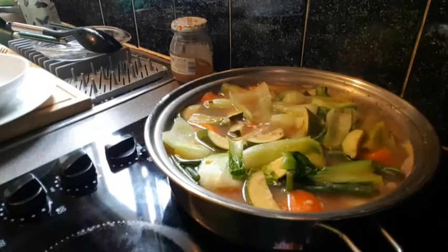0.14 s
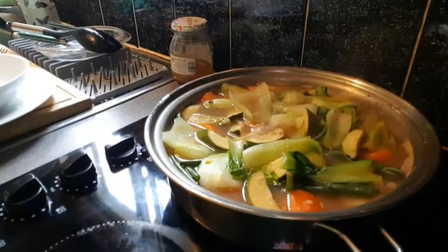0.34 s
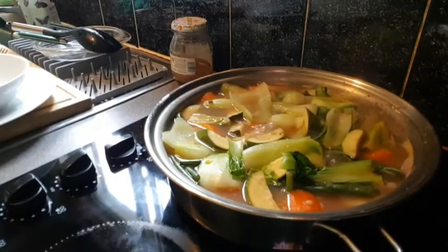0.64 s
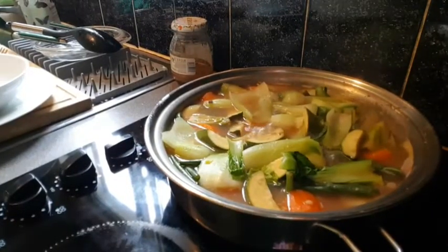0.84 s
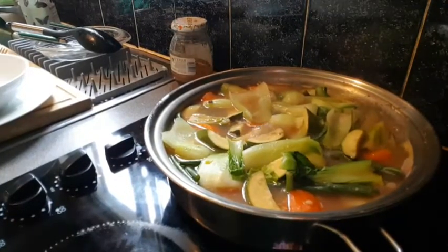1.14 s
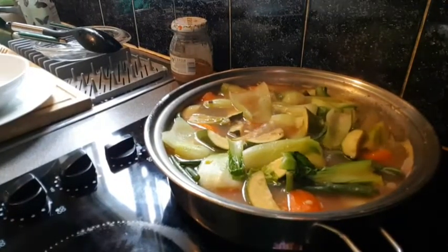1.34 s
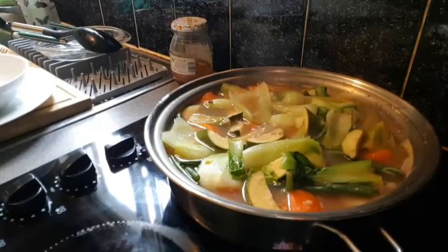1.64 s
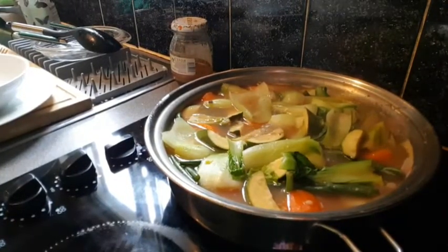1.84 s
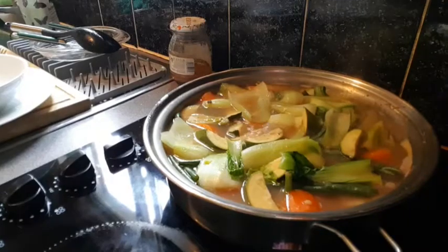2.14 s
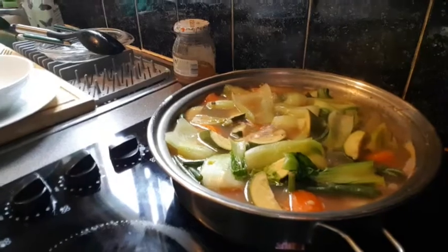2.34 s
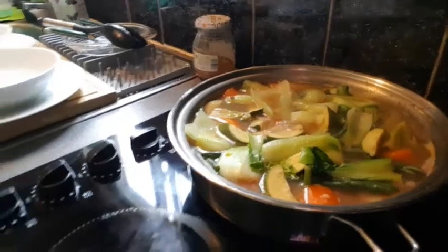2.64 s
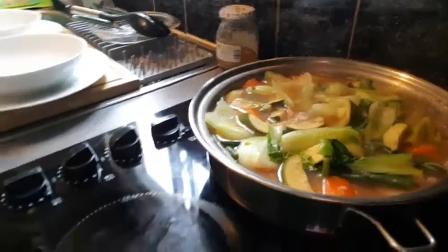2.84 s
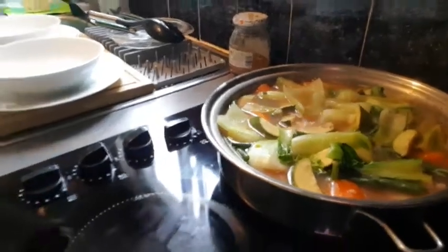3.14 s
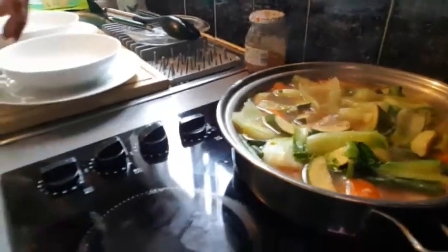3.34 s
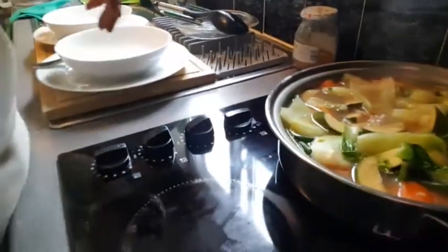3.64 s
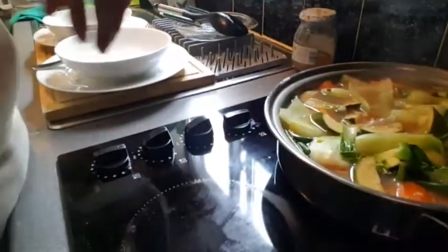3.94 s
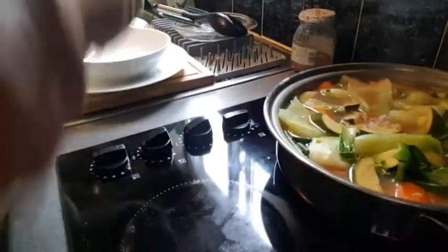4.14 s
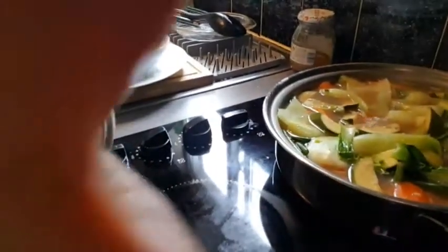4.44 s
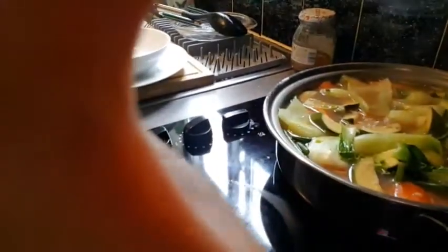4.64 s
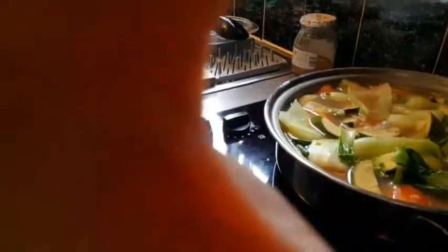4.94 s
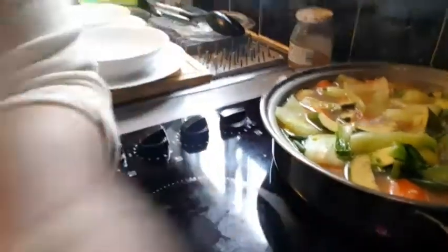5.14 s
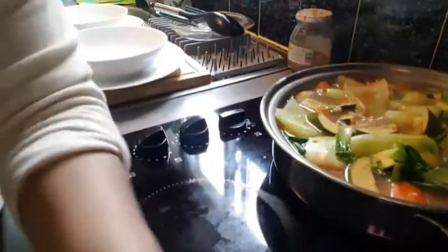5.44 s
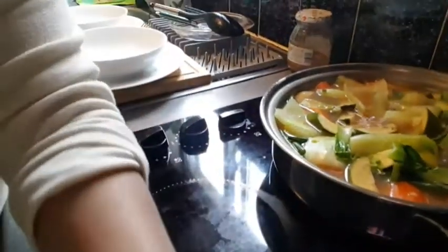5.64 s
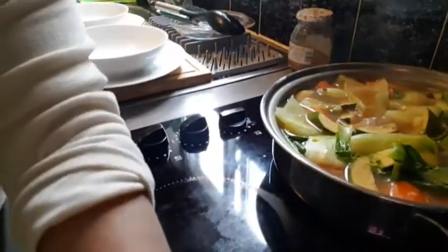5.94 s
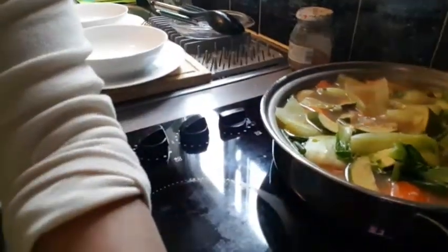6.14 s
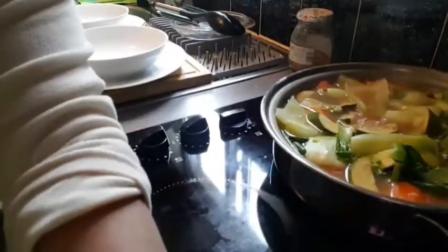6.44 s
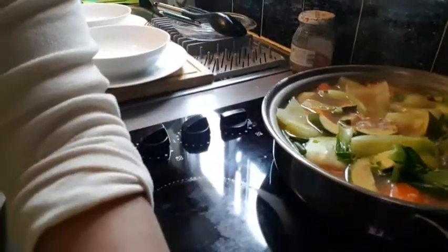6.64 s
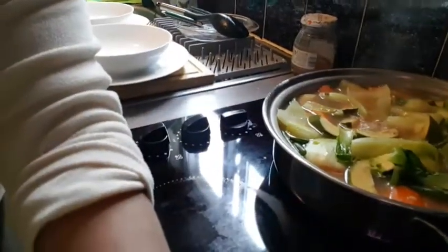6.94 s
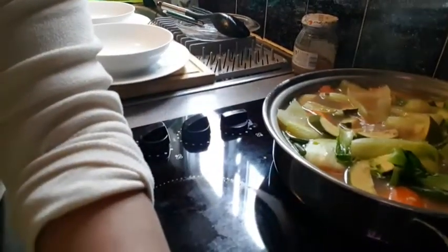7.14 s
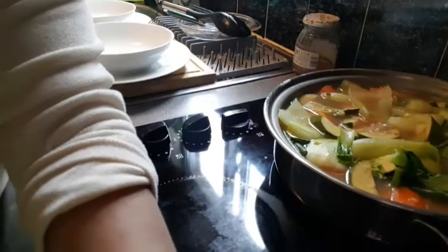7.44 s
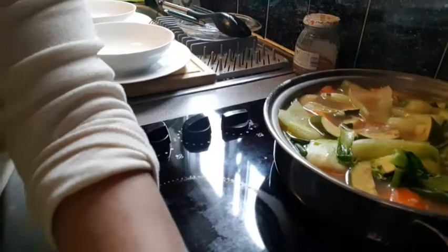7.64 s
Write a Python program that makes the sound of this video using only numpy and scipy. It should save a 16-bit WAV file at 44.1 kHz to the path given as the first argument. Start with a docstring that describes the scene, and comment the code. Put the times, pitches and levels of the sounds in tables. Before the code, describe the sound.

A wide pot of vegetable soup bubbles and glugs in a home kitchen, with dull knocks, a brief squeak and a hollow clunk before the boil eases.

```python
"""In a kitchen, vegetable soup simmers in a wide steel pot, a little to the right of the stereo microphone.
Steam glugs up as low, gliding rings; surface bubbles pop as short rings with snaps of noise; droplets tick.
Beside the stove, shaped noise rustles, furniture modes ring in two dull knocks, a stick-slip contact squeaks
and something hollow clunks down. Later the boil eases. Thin sizzle, room air and hum lie behind."""
import sys
import numpy as np
from scipy import signal
from scipy.fft import rfft, irfft
from scipy.io import wavfile
from scipy.ndimage import uniform_filter1d

SR = 44100
rng = np.random.default_rng(int(sys.argv[2]) if len(sys.argv) > 2 else 0)


def int16_out(signal):
    """Quantize to a 16-bit WAV file."""
    q = np.round(np.clip(np.atleast_2d(signal).T, -1, 1) * 32767)
    wavfile.write(sys.argv[1], SR, q.astype(np.int16))


N = 343980
TIME = np.arange(N) / SR
EDGE_HZ = 15900  # top of the recorder's band

# strength of the boil, which holds, eases and partly recovers: time_s, level_db
BOIL_CURVE = [(0, 0.5), (1.1, 3), (1.85, 1.5), (2.45, 0.5), (2.7, 1.5), (3.5, 0.5), (4.4, -1), (5.95, 0.5),
              (6.35, -1.5), (6.75, -18.5), (7.2, -20.5), (7.8, -11)]
# liveliness of the bubbling at the surface: time_s, level_db
FROTH_CURVE = [(0, 4), (.7, 1), (1.0, 1), (1.5, 0), (2.05, -0.5), (2.6, 1.5), (3.35, 2), (3.65, -2.5),
               (3.95, 1.5), (4.3, -0.5), (5.3, 1), (6.3, -3.5), (6.65, 1.5), (6.9, -6), (7.2, -6),
               (7.55, -4), (7.8, -0.5)]
# likeness of the two channels in diffuse sound: frequency_hz, likeness (0-1)
CHANNEL_LIKENESS = [(30, 1), (250, 0.87), (600, 0), (1500, 0), (5000, 0.02), (15000, 0)]


def pops(glide=0.048, glide_per_octave=0.24, echo_db=-4, snap_db=-14.0, puff_db=-16, puff_hz=820,
         after_db=-12, after_s=0.0083, after_ratio=1.227, count=2):
    """A film snaps, its cavity rings (small ones chirp up, large ones sag), steam puffs, neighbours follow."""
    # the largest bubbles bursting: start_s, level_db, pitch_hz, film_db (snap, before snap_db)
    large_pops = [(0.024, -33, 1800, -70), (0.1353, -37, 1950, -55), (0.178, -34, 1730, -55),
                  (0.2411, -38.5, 2120, -68), (0.2483, -35, 2120, -71), (0.3038, -39, 2020, -79),
                  (0.3195, -47, 2180, -76), (0.467, -40, 2220, -54), (0.474, -30.5, 1630, -55),
                  (0.5147, -38, 2720, -57), (0.5249, -29, 1760, -62), (0.6082, -33.5, 1530, -76),
                  (0.634, -35.5, 1430, -61), (0.6483, -29.5, 2010, -48.5), (0.718, -36, 1860, -76),
                  (0.7398, -41, 2200, -71), (0.785, -41, 1110, -82), (0.8253, -40, 1380, -66),
                  (0.8364, -33.5, 2300, -73), (0.946, -42, 2720, -50.5), (1.0583, -41, 1430, -58),
                  (1.1905, -36, 1590, -58), (1.2063, -34, 2150, -54), (1.2221, -39, 2150, -56),
                  (1.3146, -56, 1900, -69), (1.3216, -38.5, 1450, -55), (1.3545, -39, 900, -77),
                  (1.367, -29, 1340, -49), (1.4254, -40.5, 1660, -63), (1.4438, -37.5, 1620, -53.5),
                  (1.4588, -33, 1530, -55), (1.4992, -44.5, 2920, -78), (1.5376, -42, 2000, -60),
                  (1.5468, -30, 1740, -62), (1.5802, -39, 2230, -51), (1.607, -40, 1890, -68),
                  (1.6904, -28.5, 1650, -79), (1.6943, -30, 1860, -71), (1.756, -41, 1670, -59),
                  (1.772, -44, 3030, -73), (1.9157, -33, 1260, -58), (1.966, -40, 2130, -77),
                  (2.0255, -49, 3100, -61), (2.123, -38.5, 1680, -80), (2.1631, -42, 1710, -63),
                  (2.198, -40, 1800, -75), (2.2574, -36, 2800, -67), (2.418, -33.5, 2200, -81),
                  (2.4517, -44, 2140, -78), (2.555, -36, 1220, -74), (2.6207, -36.5, 1880, -64),
                  (2.722, -34, 1190, -61), (2.815, -61, 2500, -48), (2.8657, -38, 2550, -80),
                  (2.9, -32, 1320, -86), (2.9635, -34.5, 2400, -58), (3.011, -36.5, 1410, -81),
                  (3.043, -44, 1870, -67), (3.2516, -42.5, 1930, -56.5), (3.2658, -35, 1250, -76),
                  (3.3324, -32, 1690, -74), (3.3824, -33.5, 1950, -52), (3.404, -29.5, 1580, -55),
                  (3.5262, -39, 1840, -68), (3.5479, -41, 1600, -64), (3.9026, -35, 1450, -57),
                  (3.9256, -38, 2120, -54), (3.9362, -35, 1660, -66), (3.9558, -44, 1980, -70),
                  (4.0453, -34.5, 1710, -79), (4.1043, -32.5, 1620, -65), (4.163, -49, 2740, -52),
                  (4.3797, -44, 1910, -62), (4.4255, -33, 2520, -58), (4.4874, -59, 3150, -50.5),
                  (4.5447, -38.5, 3040, -59), (4.576, -48, 1710, -77), (4.6364, -36, 1200, -52.5),
                  (4.7024, -42, 3750, -52), (4.8565, -43.5, 3600, -63), (4.8776, -34.5, 1820, -51),
                  (4.917, -40.5, 1670, -71), (4.9287, -43, 2930, -57), (5.0025, -37, 1520, -58.5),
                  (5.1267, -30.5, 1500, -77), (5.1815, -35.5, 1500, -77), (5.1946, -38, 2680, -54),
                  (5.2424, -33, 1490, -79), (5.2782, -34, 1620, -71), (5.3577, -39, 1470, -57),
                  (5.4027, -38, 2100, -56), (5.4328, -42.5, 1020, -78), (5.453, -34.5, 1880, -70),
                  (5.5706, -37.5, 2250, -57), (5.58, -40.5, 2060, -51.5), (5.657, -35, 1680, -53.5),
                  (5.755, -27.5, 1720, -66), (5.7687, -46, 2040, -51), (5.7914, -35, 2290, -48),
                  (5.816, -33, 1930, -53), (5.8393, -42, 1570, -75), (5.8692, -39, 1750, -55),
                  (5.9, -38, 1840, -82), (5.9445, -37.5, 1480, -80), (5.9876, -48, 2450, -51.5),
                  (6.0082, -28.5, 1380, -78), (6.0185, -36, 1400, -78), (6.0298, -44, 1320, -71),
                  (6.1312, -32, 1330, -76), (6.172, -34.5, 1700, -69), (6.1845, -39, 3560, -50),
                  (6.2439, -29.5, 1550, -63), (6.2792, -39, 1880, -71), (6.3047, -36, 1620, -50.5),
                  (6.3282, -47, 3200, -57), (6.3518, -40.5, 1780, -68), (6.3778, -33.5, 1810, -45),
                  (6.4255, -34.5, 2760, -51), (6.4818, -49, 2100, -54), (6.5225, -30.5, 1650, -48),
                  (6.5404, -34, 1600, -62), (6.5756, -44, 1990, -73), (6.598, -40.5, 2450, -57),
                  (6.6827, -40, 1140, -75), (6.713, -37, 2000, -63), (6.82, -49, 1740, -75),
                  (6.851, -49, 2900, -65), (7.0008, -42.5, 2050, -85), (7.0601, -48, 1810, -67),
                  (7.0827, -46, 2250, -63.5), (7.0996, -46.5, 1900, -72), (7.1848, -50, 1800, -84),
                  (7.2744, -44, 1490, -59), (7.2876, -42, 1600, -60), (7.3224, -50, 2570, -55),
                  (7.3469, -41, 1180, -73), (7.497, -45, 1890, -77), (7.5092, -40, 1610, -68),
                  (7.5253, -48, 2240, -55), (7.6324, -39, 1210, -73), (7.673, -43, 1960, -56),
                  (7.6852, -51, 2180, -70), (7.7839, -31, 1630, -57)]
    typical_hz, typical_cycles = 1820, 1.15
    ring_power = 2.4  # power of pitch by which smaller bubbles ring for more cycles
    fewest_cycles, most_cycles = 1.05, 3.0
    lead_s = .0015  # from the snap to the ring
    out = np.zeros((2, N))
    for s, db, hz, film_db in large_pops + small_pops():
        burst = np.zeros(SR // 25)
        film = snap(low_hz=2000, high_hz=4200, decay_s=.0012)
        cycles = np.clip(typical_cycles * (hz / typical_hz) ** ring_power, fewest_cycles, most_cycles)
        bend = np.clip(glide + glide_per_octave * np.log2(hz / typical_hz), -.4, .25)
        cavity = bubble(hz, cycles, rise=.9, glide=bend)
        steam_hz = min(puff_hz, hz) * rng.uniform(0.57, 1.54)
        puff = bubble(steam_hz, cycles=0.92, rise=1.0, glide=0)
        add(burst, 0, gain_of(film_db + snap_db) * film)
        add(burst, lead_s, gain_of(db) * cavity)
        add(burst, lead_s, gain_of(db + puff_db) * puff)
        for k in range(count):
            neighbour_hz = min(hz, typical_hz) * after_ratio * rng.uniform(.7, 1.4)
            neighbour = bubble(neighbour_hz, cycles=1.3, rise=.9, glide=bend)
            wait_s = after_s * (k + 0.302 + rng.random())
            add(burst, lead_s + wait_s, gain_of(db + after_db) * neighbour / (k + 1))
        heard = bounced(burst, rng.uniform(.0001, .00028), echo_db, spread_s=.0033)
        add(out, s - lead_s, panned(heard, 4.7 + rng.standard_normal()))
    return out


def small_pops(top_db=-43, range_db=13, pitch_hz=2050, octaves=0.37, film_db=-62, film_range_db=14, count=150):
    """Lesser bubbles burst at random, louder where the surface is lively; columns as for the large pops."""
    when, size, film, pitch = rng.random((4, count))
    s = (np.arange(count) + 2 * when) % count / count * N / SR
    hz = pitch_hz * 2 ** (octaves * (2 * pitch + 2 * size - 2))  # weaker bubbles tend to be higher
    lively = follow(FROTH_CURVE, s)
    return list(zip(s, top_db - range_db * size + lively, hz, film_db - film_range_db * film + lively))


def glugs(level_db=-7.0, rise=0.38, glide=0.72, slap_db=-14, slap_hz=480):
    """A big steam bubble heaves the broth, ringing low and gliding up; the broth slaps shut behind it."""
    # the largest steam bubbles: start_s, level_db (before the setting level_db), pitch_hz,
    # ring_cycles (to 1/e; bubble() rings for 0.4 at least)
    large_glugs = [(0.068, -27, 225, 1.56), (0.36, -26.5, 149, 0.67), (0.405, -32, 235, 2.1),
                   (0.4406, -36, 250, 0.69), (0.6157, -27.5, 226, 1.34), (0.818, -22, 199, 0.49),
                   (0.8514, -25.5, 280, 0.75), (1.0405, -33, 160, 0.61), (1.124, -27, 256, 1.2),
                   (1.3521, -31, 205, 0.78), (1.4549, -32, 191, 0.37), (1.542, -30, 170, 0.55),
                   (1.638, -30, 223, 0.32), (1.686, -33, 272, 1.25), (2.26, -23, 196, 1.1),
                   (2.355, -35, 145, 4.6), (2.4028, -26.5, 187, 0.74), (2.425, -37, 152, 4.6),
                   (2.447, -33, 147, 3), (2.4822, -25, 180, 0.32), (2.506, -36.5, 153, 2.7),
                   (2.8697, -28.5, 252, 0.44), (3.0033, -26, 182, 0.37), (3.204, -28, 280, 0.36),
                   (3.503, -29, 270, 0.6), (3.546, -31.5, 217, 0.75), (3.917, -28.5, 283, 0.48),
                   (4.0447, -27, 204, 0.33), (4.1419, -32, 203, 0.85), (4.2639, -34.5, 201, 1.1),
                   (4.375, -31, 336, 0.9), (4.836, -31, 180, 0.35), (5.244, -28, 198, 0.89),
                   (5.9596, -29.5, 187, 0.95), (6.1764, -31.5, 167, 1.15), (6.72, -32, 380, 0.64),
                   (6.808, -34.5, 384, 0.87), (6.888, -36, 327, 1.3), (6.949, -40, 420, 0.31),
                   (7.0487, -36.5, 312, 0.7), (7.416, -37, 382, 0.38), (7.764, -38.5, 330, 1.1)]
    out = np.zeros((2, N))
    for s, db, hz, cycles in large_glugs + small_glugs():
        heave = bounced(bubble(hz, cycles, rise, glide), .00012, echo_db=-7.5, spread_s=0.00679)
        closing = bubble(slap_hz * rng.uniform(.8, 1.25), cycles=.6, rise=.3, glide=.1)
        slap = bounced(closing, .0003, echo_db=-5, spread_s=.003)
        add(out, s, gain_of(db + level_db) * panned(heave, 3.7))
        add(out, s + .5 / hz, gain_of(db + level_db + slap_db) * panned(slap, 18.6))
    return out


def small_glugs(top_db=-33, range_db=7, pitch_hz=200, octaves=0.74, boil_share=0.59, rise_hz_per_db=6, count=40):
    """Lesser glugs come at random, weaker and higher as the boil eases; columns as for the large glugs."""
    when, size, pitch, length = rng.random((4, count))
    s = (np.arange(count) + when) / count * N / SR
    boil = follow(BOIL_CURVE, s)
    hz = (pitch_hz - rise_hz_per_db * boil) * 2 ** (octaves * (2 * pitch - 1))
    return list(zip(s, top_db - range_db * size + boil_share * boil, hz, (1 + length) / 2))


def simmer(crackle_db=-70.5, fine_db=-61.5, burble_db=-56, churn_db=-54.5, burble_share=0.31, roll_db=3.5):
    """Broth churns in surges and burbles with the boil; fine bubbling and faint crackle follow the froth."""
    # spectrum of the churning broth: frequency_hz, level_db
    churn_colour = [(15, -33), (25, -8), (32, -27), (42, 1), (60, -7.5), (90, -1.5), (125, -5.5), (160, -3),
                    (215, -3.5), (300, -7.5), (420, -17.5), (650, -29), (1200, -25), (4000, -73)]
    boil, froth = follow(BOIL_CURVE, TIME), follow(FROTH_CURVE, TIME)
    surges = roll_db * flicker(size=2600)
    churn = gain_of(churn_db + boil + surges) * noise(churn_colour)
    low_bubbles = swarm(low_hz=217.8, high_hz=656, per_s=200, spread_db=6.0, tilt_db=-6.0)
    burble = gain_of(burble_db + burble_share * boil) * low_bubbles
    small_bubbles = swarm(low_hz=991, high_hz=3460, per_s=330, spread_db=6.5, tilt_db=-3.0)
    fine = gain_of(fine_db + froth) * small_bubbles
    tiny_bubbles = swarm(low_hz=2600, high_hz=4600, per_s=110, spread_db=6.0, tilt_db=-3.0, cycles=2.2)
    crackle = gain_of(crackle_db + froth) * tiny_bubbles
    return panned(fine + burble + crackle, 6.1) + panned(churn, 0.78)


def swarm(low_hz, high_hz, per_s, spread_db, tilt_db, cycles=1.1, count=40):
    """Many bubbles of count sizes ring at random moments; tilt_db is the change in level per octave."""
    out = np.zeros((2, N))
    tries = 300  # possible bubbles of each size
    for hz in np.geomspace(low_hz, high_hz, count):
        ring = bubble(hz, cycles * rng.uniform(.7, 1.4), rise=.6, glide=.22)
        shape = bounced(ring, 0.0002, echo_db=2.5, spread_s=.003)
        for chance, when, size in rng.random((tries, 3)):
            if chance < per_s * N / SR / count / tries:
                db = spread_db * min(-np.log(1 - size), 2) + tilt_db * np.log2(hz / low_hz)
                add(out, when * N / SR, gain_of(db) * shape)
    return evened(out)


def ticks(ping_db=-2, spit_level_db=-1, faint_db=-80, faint_hz=4900, faint_spray_db=-86, count=16):
    """Droplets leave the surface: a short ping in a spit of noise, with a thin click of spray above. Two light
    clicks of a utensil are played the same way."""
    # the clearest droplets, and two light clicks of a utensil (6.5063 s, 7.6557 s): start_s, spit_db (before
    # spit_level_db), pitch_hz, spray_db
    clear_drops = [(0.165, -75, 5470, -82), (0.275, -89, 7500, -83), (0.661, -71.5, 6860, -89),
                   (0.8755, -83, 6500, -87), (1.436, -76, 5600, -91), (1.4443, -81, 5200, -87),
                   (1.538, -74, 6540, -87), (1.558, -70.5, 5200, -77), (1.7, -77, 5000, -87),
                   (1.8693, -92, 7550, -80), (1.971, -69, 7500, -79), (2.1013, -90, 6000, -84),
                   (2.578, -77, 7000, -94), (2.6105, -72, 4150, -95), (2.644, -79, 4100, -86),
                   (2.653, -73.5, 7060, -89), (2.6665, -81, 6000, -85), (2.685, -75, 4640, -74),
                   (2.8233, -64, 3800, -94), (2.964, -70.5, 4500, -83), (3.0716, -75, 5250, -78),
                   (3.076, -78, 6000, -81), (3.332, -75.5, 6100, -96), (3.3968, -71, 6130, -77),
                   (3.777, -75.5, 4860, -80), (3.784, -86, 5500, -85), (3.8358, -75, 5070, -77),
                   (4.0802, -85, 6950, -73), (4.445, -88, 6000, -83), (4.674, -74, 6430, -82),
                   (4.7602, -76, 4640, -77), (4.805, -77.5, 6900, -75), (4.9972, -88, 6000, -86),
                   (5.0945, -91, 5500, -90), (5.1052, -70, 3920, -93), (5.2945, -67.5, 5070, -75),
                   (5.4637, -77, 6150, -98), (5.768, -75, 4600, -83), (5.78, -76, 7000, -87),
                   (5.8672, -78, 6500, -83), (6.0124, -88, 5500, -76), (6.0937, -81, 5000, -90),
                   (6.104, -68.5, 5950, -78), (6.5063, -63, 4060, -94), (6.618, -78, 4500, -84),
                   (7.1718, -78.5, 5980, -83), (7.3535, -84, 6000, -81), (7.6467, -73, 4300, -91),
                   (7.6557, -61, 4060, -88), (7.757, -79, 6000, -87), (7.791, -79, 5000, -84)]
    out = np.zeros((2, N))
    # faint droplets fall at random and follow the froth
    when, pitch = rng.random((2, count))
    moments = when * N / SR
    lively = follow(FROTH_CURVE, moments)
    faint_pitch = faint_hz * 2 ** (.5 * (pitch - .5))
    faint = list(zip(moments, faint_db + lively, faint_pitch, faint_spray_db + lively))
    for s, db, hz, spray_db in clear_drops + faint:
        spit = gain_of(spit_level_db) * snap(low_hz=.65 * hz, high_hz=1.25 * hz, decay_s=.0007) / 2
        add(spit, 0, gain_of(ping_db) * bubble(hz, cycles=3, rise=1, glide=.1))
        spray = snap(low_hz=7000, high_hz=16000, decay_s=.0006) / 2
        drop = gain_of(db) * spit + gain_of(spray_db) * spray
        add(out, s, bounced(drop, 0, echo_db=-4, spread_s=.0025))
    return out


def pot(x, ring_db):
    """The air and steel of the open pot resonate with a sound made inside it."""
    # resonances of the pot: frequency_hz, width_hz, level_db (before ring_db)
    pot_modes = [(116, 42, 6), (151, 6.8, -4), (329, 126, -6), (512, 36, -6), (804, 46, 9),
                 (852, 34.2, 10.5), (1216, 35, -16), (1482, 65, -3), (1750, 78, -12.5), (1926, 520, -5),
                 (2580, 160, -4.5)]
    ring = np.zeros_like(x)
    for hz, width, db in pot_modes:
        ring += gain_of(db) * signal.lfilter(*signal.iirpeak(hz, hz / width, SR), x)
    return x + gain_of(ring_db) * panned(ring, 1.2)


def clunks(glide=-0.1, echo_db=-15, right_db=9):
    """Something is set down with a hollow clunk and rocks to rest: short, dead contacts that fall in pitch."""
    # contacts: start_s, level_db, pitch_hz
    contacts = [(6.0131, -22.5, 534), (6.0178, -39, 810), (6.0268, -40, 420), (6.0295, -38, 1000),
                (6.0318, -32.5, 604), (6.035, -37, 520), (6.0445, -37, 480), (6.0645, -48, 620),
                (6.0705, -62, 450)]
    out = np.zeros((2, N))
    for s, db, hz in contacts:
        contact = bubble(hz, cycles=.4, rise=.7, glide=glide)
        add(out, s, gain_of(db) * bounced(contact, .0002, echo_db, spread_s=.003))
    return panned(out, right_db)


def knocks(thud_db=-23, rebound_db=-25, rebound_s=.009):
    """Two soft, heavy blows: a dull thud rings the same few furniture modes and rebounds once."""
    # blows: start_s, level_db
    blows = [(3.103, -26.5), (3.7706, -31.5)]
    # what the furniture rings with: frequency_hz, level_db (relative), t60_s
    furniture_modes = [(156.7, 16.5, 0.12), (114, 3, 0.091), (308, -23, 0.03), (460, 0, 0.094),
                       (573, -9, 0.055), (803, 4, 0.11), (870, -11, 0.04), (1076, -31, 0.023),
                       (1390, -26, 0.035), (1810, -31, 0.05)]
    out, t = np.zeros((2, N)), np.arange(SR // 3) / SR
    ring = np.zeros(len(t))
    for k, (hz, db, t60) in enumerate(furniture_modes):
        ring += gain_of(db - 60 * t / t60) * np.sin(2 * np.pi * hz * t) * (-1) ** k
    for s, db in blows:
        add(out, s, gain_of(db) * ring / abs(ring).max())
        add(out, s, gain_of(db + thud_db) * snap(low_hz=116, high_hz=1100, decay_s=0.0013))
        add(out, s + rebound_s, gain_of(db + rebound_db) * snap(low_hz=300, high_hz=950, decay_s=0.0018))
    return panned(out, 5.9)


def squeak(right_db=6.0):
    """A surface sticks and slips, each slip rasping; pitch drops and roughness grows as the tone fades."""
    # pitch of the squeak: time_s, pitch_hz
    squeak_pitch = [(3.417, 1440), (3.424, 1480), (3.434, 1440), (3.442, 1500), (3.449, 1465),
                    (3.456, 1330), (3.459, 1090), (3.472, 1080), (3.481, 940), (3.495, 1095), (3.511, 1140),
                    (3.516, 1080), (3.521, 915), (3.534, 940), (3.556, 900)]
    # spectra of the tone, the rasp and the scrape, each: frequency_hz, level_db
    tone_colour = [(800, 6), (1100, -3.5), (1470, 4.5), (2100, -7), (2850, 4), (3500, -15), (4350, 3),
                   (5000, -14), (5450, -0.5), (6100, -13), (8000, -13), (9700, -15), (11800, -10),
                   (13300, -6), (14800, -15), (16000, -27)]
    rasp_colour = [(300, -30), (1100, -1), (2000, -1), (2850, 2), (3500, -15), (4350, 2), (5500, -8),
                   (7000, -9), (16000, -24)]
    scrape_colour = [(200, -32), (900, -7), (2500, 0), (5000, 0), (8000, 6), (10000, -16), (12500, -7),
                     (14800, -14), (16000, -24)]
    start_db, fade_db_per_s, attack_s, release_s = -45.5, -67, 0.0061, 0.025
    dull_db_per_s = 73  # extra fade of a partial at EDGE_HZ
    waver, rough, rough_per_s = .004, .006, .04  # pitch wander, as a share of the pitch
    chatter_db, breakup_db = 1.8, 2.8  # wander of the whole level and of each partial
    rasp_db, scrape_db, scrape_db_per_s = -11, -9.5, 20  # relative to the squeak's level
    start, end = squeak_pitch[0][0], squeak_pitch[-1][0]
    age = np.arange(0, end - start, 1 / SR)
    hz = follow(squeak_pitch, start + age)
    gate = np.minimum(age / attack_s, 1) * np.minimum(age[::-1] / release_s, 1)
    slow, fast, grip = (flicker(size)[:len(age)] for size in (400, 40, 200))
    level = gate * gain_of(start_db + fade_db_per_s * age + chatter_db * grip)
    turns = np.cumsum(hz * (1 + waver * slow + (rough + rough_per_s * age) * fast)) / SR
    order = np.arange(1, 18)[:, None]
    breakup = breakup_db * flicker(size=240)[:order.size * len(age)].reshape(order.size, -1)
    dulling = dull_db_per_s * age * (order * hz / EDGE_HZ) ** 2
    partials = gain_of(read(tone_colour, order * hz) + breakup - dulling) * (order * hz < EDGE_HZ)
    tone = evened((partials * np.sin(2 * np.pi * order * turns)).sum(0))
    slips = evened(np.exp(-2 * (turns % 1)))  # each slip starts at once and dies away
    rasp = gain_of(rasp_db) * slips * noise(rasp_colour)[:, :len(age)]
    scrape = gain_of(scrape_db + scrape_db_per_s * age) * noise(scrape_colour)[:, :len(age)]
    out = np.zeros((2, N))
    add(out, start, panned(bounced(level * tone, 0, echo_db=-4, spread_s=.0025), right_db))
    add(out, start, level * (rasp + scrape))
    return out


def rustles(level_db=-2, brush_db=-63, brush_s=0.14):
    """A sleeve or hand strokes as swelling noise, over a softer, longer brush of clothes."""
    # strokes: peak_s, level_db (before the setting level_db), rise_s, fall_s (both to 1/e)
    stroke_rows = [(0.031, -39, 0.015, 0.026), (0.372, -52, 0.017, 0.069), (0.615, -52, 0.037, 0.055)]
    # spectrum of cloth: frequency_hz, level_db
    cloth_colour = [(200, -24), (900, -6), (2500, 5), (5000, -4), (8000, -6.5), (10000, -12.5),
                    (13000, -7.5), (15000, -9), (16000, -18)]
    strokes = sum(gain_of(db) * swell(s, rise_s, fall_s) for s, db, rise_s, fall_s in stroke_rows)
    brush = gain_of(brush_db) * swell(brush_s, rise_s=0.65, fall_s=0.4)
    return panned(gain_of(level_db) * (strokes + brush) * noise(cloth_colour), -0.23)


def sizzle(start_db=-70, fade_db_per_s=-0.32, flutter_db=1.5):
    """A thin, fluttering hiss of noise slowly dies down, with a few brief flares."""
    # flares: peak_s, level_db
    flare_rows = [(6.025, -61), (6.108, -72), (6.19, -63), (6.27, -60.5)]
    # spectrum of the sizzle: frequency_hz, level_db
    hiss_colour = [(1000, -7.5), (6000, -8), (9500, -15.5), (12500, -11), (16000, -16)]
    flutter = flutter_db * evened(uniform_filter1d(rng.standard_normal(N), size=700))
    flares = sum(gain_of(db) * swell(s, rise_s=0.012, fall_s=0.013) for s, db in flare_rows)
    return (gain_of(start_db + fade_db_per_s * TIME) + flares) * gain_of(flutter) * noise(hiss_colour)


def appliance_hum(level_db=-2):
    """A faint appliance hums as a few steady sines, alike in both channels."""
    # hum tones: frequency_hz, rms_db (before level_db)
    hum_tones = [(53.8, -70.5), (107.7, -68), (411, -66)]
    hum = np.zeros(N)
    for hz, db in hum_tones:
        hum += np.sqrt(2) * gain_of(db + level_db) * np.sin(2 * np.pi * (hz * TIME + rng.random()))
    return hum


def room_air(level_db=-62.5):
    """The air of the room is steady coloured noise."""
    # spectrum of the room: frequency_hz, level_db
    air_colour = [(20, -34), (45, -43), (60, 11), (110, -19), (200, -7), (310, -15.5), (410, 2.5),
                  (600, -7), (850, -11.5), (1150, -12), (1500, -8.5), (2100, -12), (5600, -32.5),
                  (8000, -29.5), (9500, -40.5), (15800, -23.5)]
    return gain_of(level_db) * noise(air_colour)


def kitchen(x):
    """The kitchen answers with a diffuse tail, each band dying at its own speed."""
    # reverberation: frequency_hz, t60_s
    room_decay = [(100, 0.33), (500, 0.19), (2000, 0.11), (6000, 0.27), (15000, 0.075)]
    taps = rng.standard_normal((2, SR // 2)) * (np.arange(SR // 2) > .006 * SR)
    hz, t, z = signal.stft(taps, SR, nperseg=256)
    same = np.clip(read(CHANNEL_LIKENESS, hz), 0, 1)[:, None]
    z[1] = same * z[0] + np.sqrt(1 - same ** 2) * z[1]
    decay = gain_of(-60 * t / read(room_decay, hz)[:, None])
    tail = signal.istft(z * decay, SR, nperseg=256)[1]
    return signal.fftconvolve(x, tail / np.linalg.norm(tail[0]), axes=1)[:, :N]


def bubble(hz, cycles, rise, glide):
    """A pocket of gas rings for a few cycles (to 1/e); its pitch climbs, or sags if glide is negative."""
    cycles = max(cycles, .4)
    age = np.arange(int(7 * cycles / hz * SR) + 8) * hz / SR  # in cycles
    envelope = (1 - np.exp(-(age / rise) ** 2)) * np.exp(-age / cycles)
    pitch = hz * (1 + glide * (np.tanh(age / cycles) - .5))
    return envelope / envelope.max() * np.sin(2 * np.pi * np.cumsum(pitch) / SR)


def snap(low_hz, high_hz, decay_s):
    """A burst of band-limited noise swells and dies within milliseconds, as when a film tears."""
    t = np.arange(SR // 50) / SR
    band = signal.butter(3, [low_hz, min(high_hz, SR / 2.2)], "band", fs=SR, output="sos")
    burst = signal.sosfilt(band, rng.standard_normal(len(t)) * t * np.exp(-t / decay_s))
    return evened(burst) * np.sqrt(len(t) / SR / decay_s / 2)


def bounced(x, lag_s, echo_db, spread_s, count=12):
    """Sound reaches the left side lag_s late, followed by echoes off the pot wall, hob and tiles."""
    direct, echoes = np.zeros((2, 2, SR // 30))
    delay = np.minimum(spread_s * (.2 + rng.exponential(1, count)), .028)
    strength = rng.choice([-1, 1], count) * np.exp(-delay / (3 * spread_s))
    for side in range(2):
        direct[side, int(abs(lag_s) * SR) * (1 - side)] = 1
        taps = ((delay + rng.uniform(0, .0005, count)) * SR).astype(int)
        np.add.at(echoes[side], taps, strength)
    response = direct + gain_of(echo_db) * echoes / np.linalg.norm(strength)
    return signal.fftconvolve(x[None], response, axes=1)


def noise(colour):
    """Two channels of coloured noise, most alike in the bass."""
    hz = np.fft.rfftfreq(N, 1 / SR)
    a, b = rfft(rng.standard_normal((2, N)))
    same = np.clip(read(CHANNEL_LIKENESS, hz), 0, 1)
    pair = np.array([a, same * a + np.sqrt(1 - same ** 2) * b])
    return evened(irfft(pair * gain_of(read(colour, hz)), N))


def flicker(size):
    """A random wander of rms one that changes over size samples."""
    return evened(uniform_filter1d(uniform_filter1d(rng.standard_normal(N), size), size // 2))


def swell(peak_s, rise_s, fall_s):
    """An envelope that grows to one at peak_s and dies away."""
    return np.exp(-np.maximum((peak_s - TIME) / rise_s, (TIME - peak_s) / fall_s))


def panned(x, right_db):
    """Makes the right channel louder than the left by right_db."""
    return x * gain_of(np.array([[-right_db], [right_db]]) / 2)


def add(mix, s, sound):
    """Mixes a sound in at time s."""
    part = mix[..., max(round(s * SR), 0):][..., :sound.shape[-1]]
    part += sound[..., :part.shape[-1]]


def follow(rows, t, axis=1):
    """Reads one column of a curve at the times t."""
    rows = np.array(rows)
    return np.interp(t, rows[:, 0], rows[:, axis])


def read(points, hz):
    """Reads a spectrum on a log-frequency axis."""
    f, value = np.transpose(points)
    return np.interp(np.log(hz + 1), np.log(f + 1), value)


def evened(x):
    """Scales to an rms of one."""
    return x / np.sqrt(np.mean(x ** 2) + 1e-20)


def gain_of(db):
    """Decibels to amplitude."""
    return 10 ** (np.asarray(db) / 20)


def scene():
    """The pot and the small noises beside it stand in the kitchen; the clunk is close and almost dry."""
    soup = pot(pops() + glugs() + simmer(), ring_db=4.0) * gain_of(-4.5)
    near = soup + ticks() + knocks() + squeak()
    close = clunks()
    reverberation = gain_of(-9.5) * kitchen(near + gain_of(-21) * close)
    background = rustles() + sizzle() + appliance_hum() + room_air()
    return near + close + reverberation + background


def record(dry):
    """The recorder's band limit: a steep low-pass at EDGE_HZ."""
    low_pass = signal.firwin(511, EDGE_HZ, window=("kaiser", 9), fs=SR)
    return signal.oaconvolve(dry, low_pass[None], "same")


dry = scene()
out = record(dry)
int16_out(out)
```